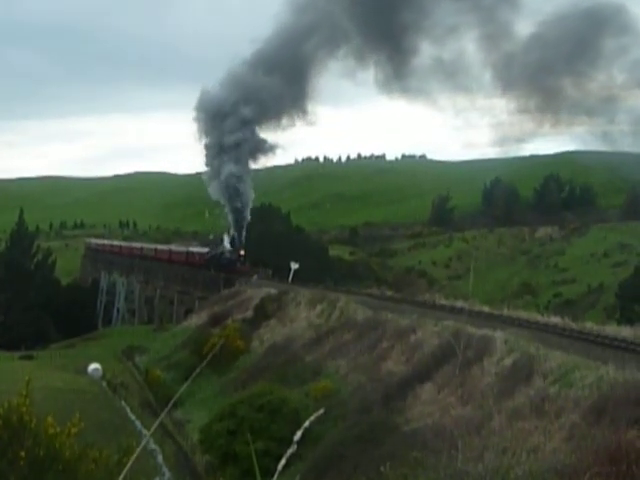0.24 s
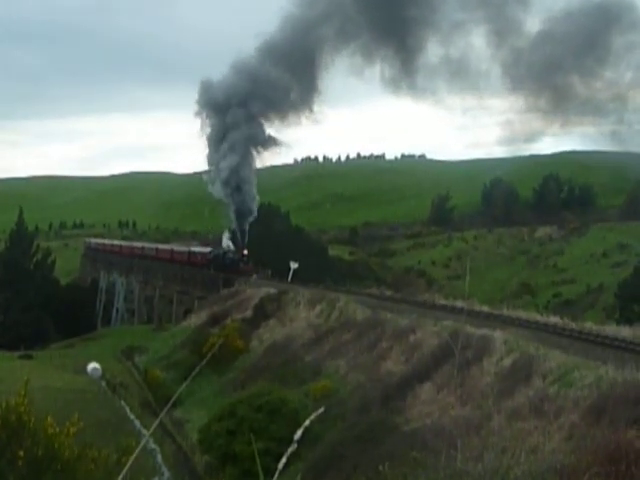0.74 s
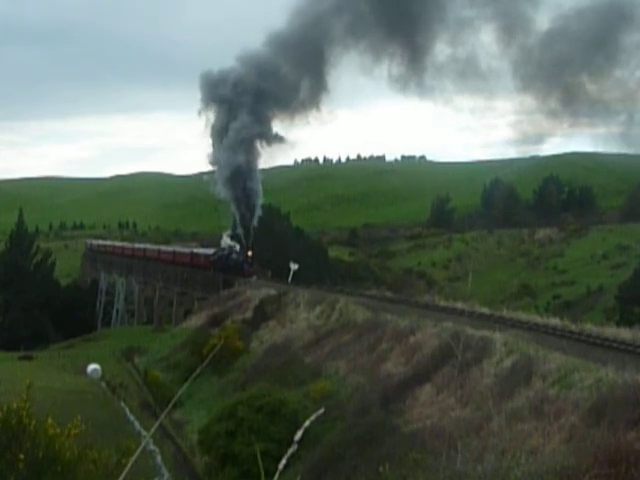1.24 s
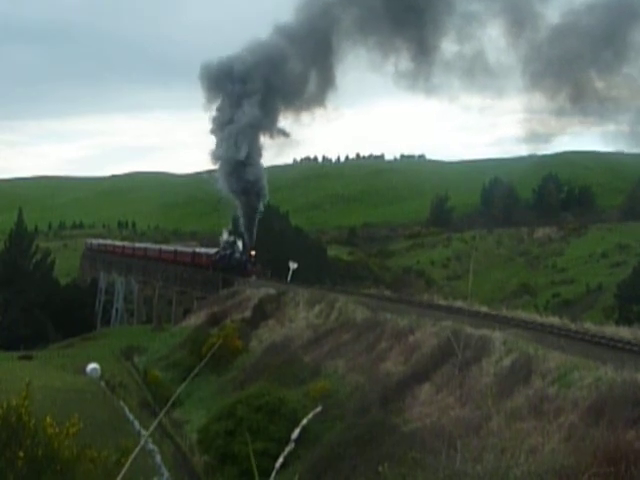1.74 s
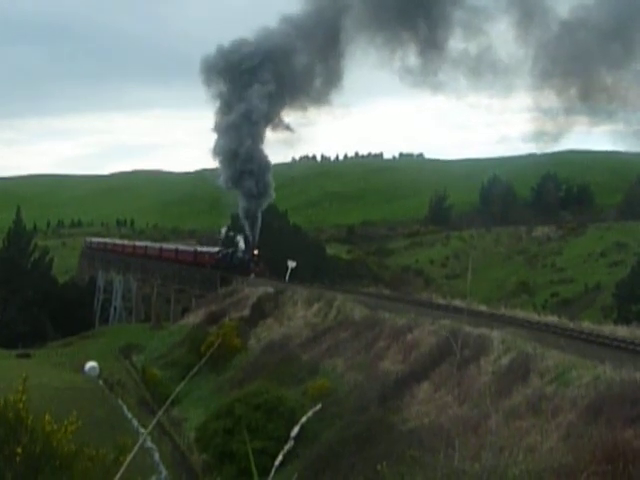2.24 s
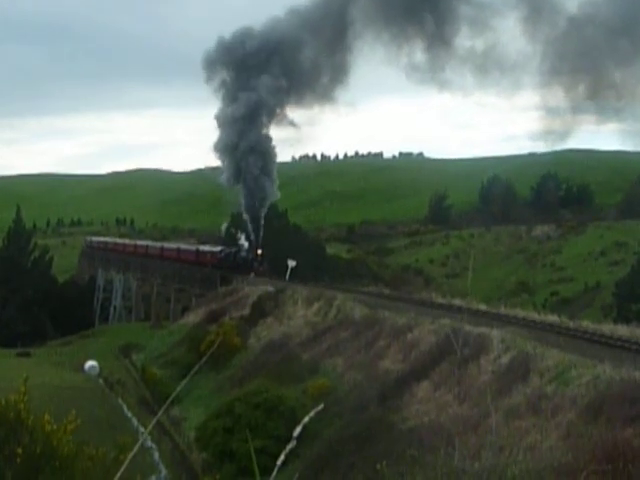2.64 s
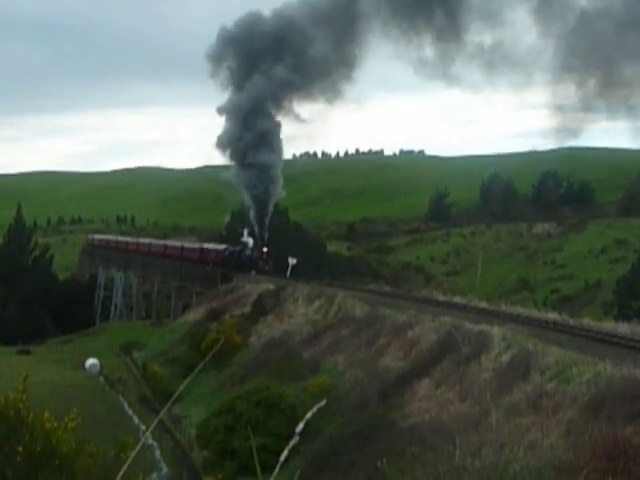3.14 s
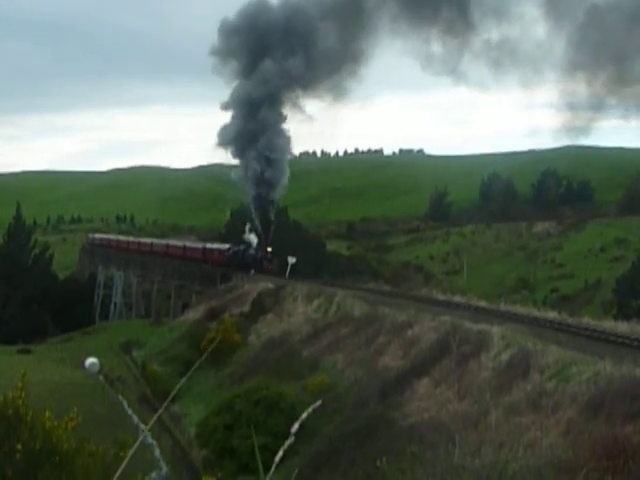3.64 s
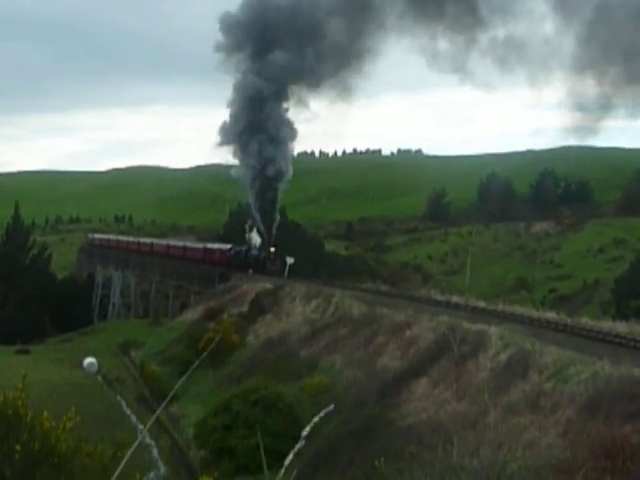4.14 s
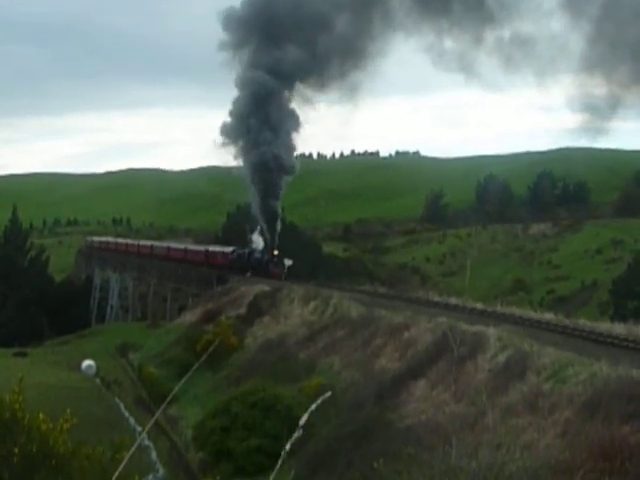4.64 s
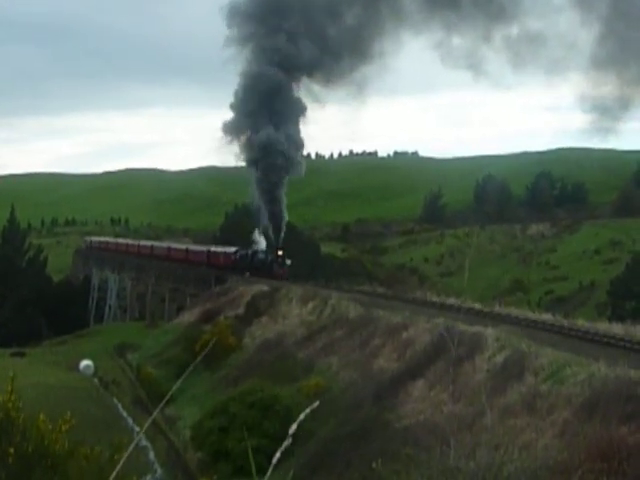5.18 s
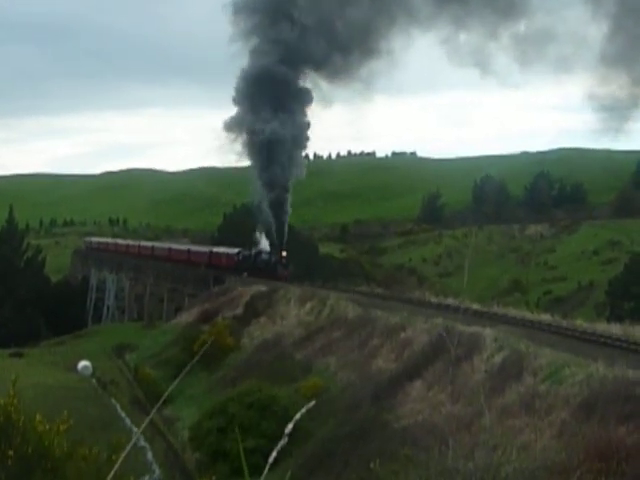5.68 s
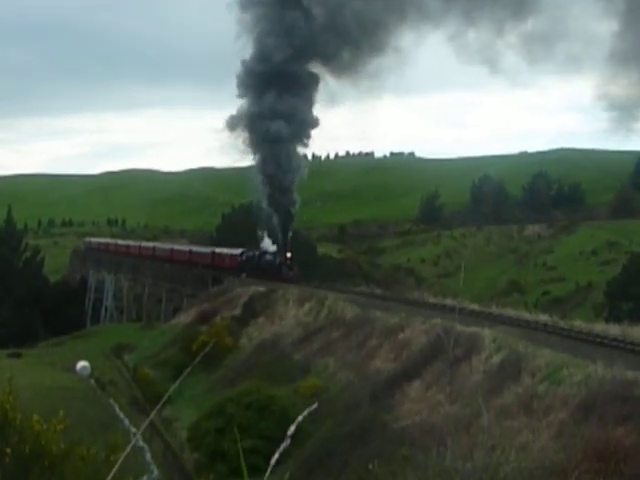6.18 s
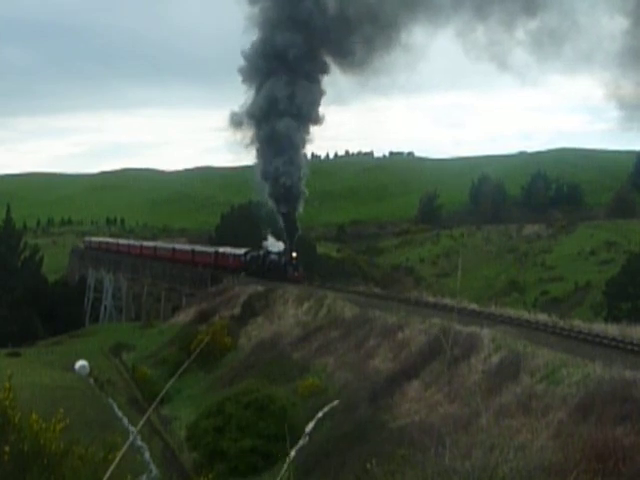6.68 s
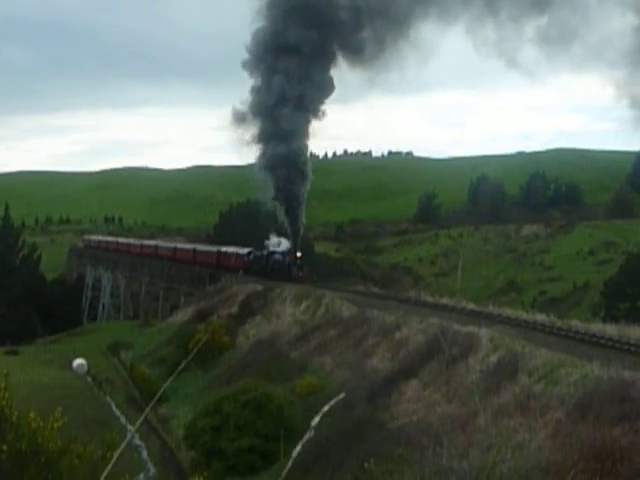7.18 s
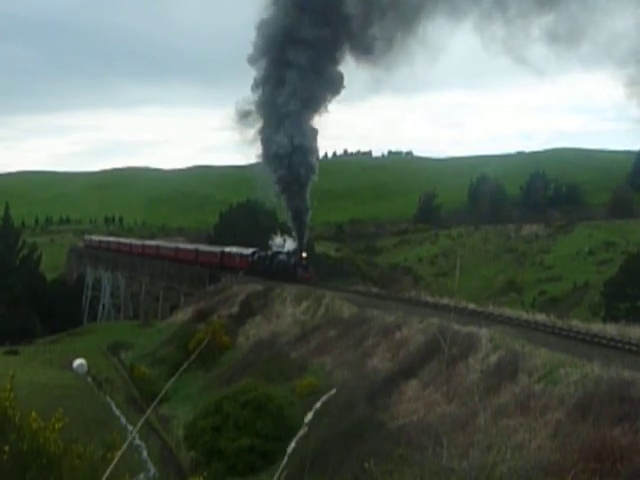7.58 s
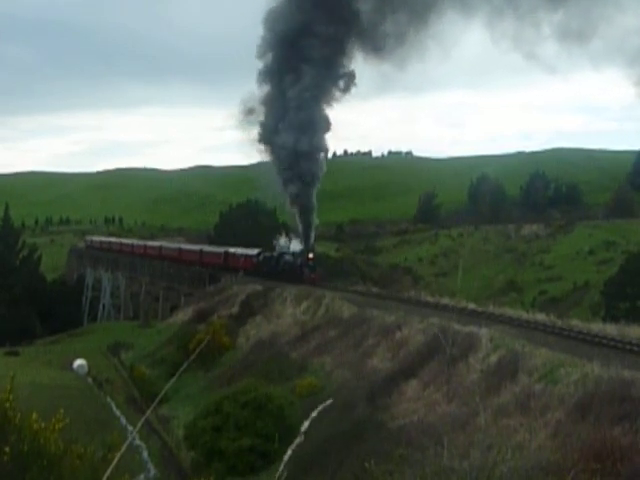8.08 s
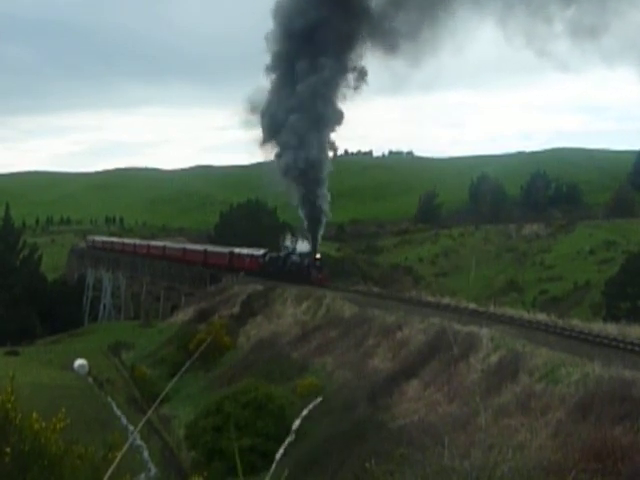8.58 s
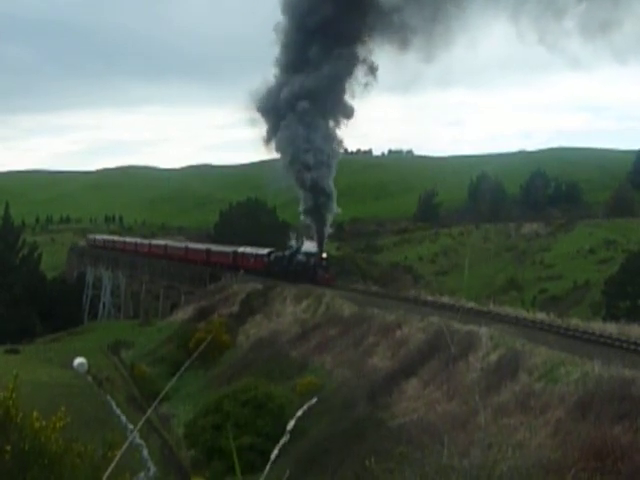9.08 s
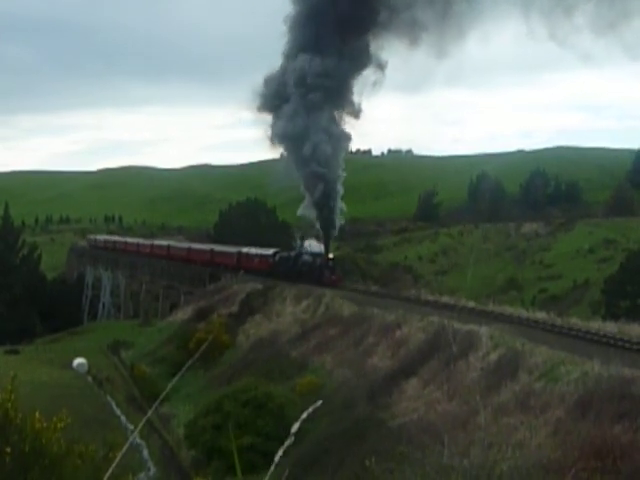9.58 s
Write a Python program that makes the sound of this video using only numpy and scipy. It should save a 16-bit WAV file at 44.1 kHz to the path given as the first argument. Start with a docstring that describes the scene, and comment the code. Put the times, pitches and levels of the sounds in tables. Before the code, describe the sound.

Fast, steady puffs of a distant steam train working along a hillside, with light hiss and a soft rolling rumble.

```python
"""On a hillside line some way off, a steam locomotive climbs at nearly five exhaust beats a second.
Each beat is a turbulent jet, coloured by the chimney and nearby reflections, hollowed by interference
with the wave off the ground and echoed by the hills. Beneath it the train rumbles and a viaduct drums;
steam leaks, small ticks sound, a wheel flange sings faintly and a thin whine persists.
A fast limiter flattens the loudest peaks."""
import sys
import numpy as np
from scipy import signal
from scipy.fft import rfft, irfft, next_fast_len
from scipy.io import wavfile
from scipy.ndimage import uniform_filter1d, minimum_filter1d

SR = 44100
rng = np.random.default_rng(int(sys.argv[2]) if len(sys.argv) > 2 else 0)


def unload_audio(sound):
    """Save the sound as a 16-bit wav file, at the path given as the first command line argument."""
    columns = np.transpose(np.atleast_2d(sound))
    # keep every value between -1 and 1, then stretch to whole-number steps
    steps = np.round(np.clip(columns, -1, 1) * 32767)
    wavfile.write(sys.argv[1], SR, steps.astype(np.int16))


N = 433062
TIME = np.arange(N) / SR

# The engine gathers speed, then eases: time_s, beat_rate_hz
BEAT_RATE = [(0, 4.693), (1.5, 4.559), (3, 4.668), (6.5, 5.201), (7.5, 5.092), (9.8, 4.707)]
# Four unevenly set valve events to a wheel turn: delay_s, bark_offset_db, hiss_offset_db
VALVES = [(.0026, -0.25, 0.15), (.0041, .5, 0.9), (-.0011, -0.5, -.6), (0, -0.4, -0.7)]
# Broad spectrum of the exhaust: frequency_hz, density_db
EXHAUST_SPECTRUM = [(25, -36.5), (50, -22.5), (150, -16), (235, -14.5), (300, -8), (420, -10), (560, -17.5),
                    (1000, -21), (1650, -26), (2100, -29), (4200, -38.5), (6000, -49), (7200, -58.5),
                    (8400, -76)]
# Peaks and one dip colouring it, from the chimney and nearby reflections: centre_hz, width_hz, gain_db
EXHAUST_COLOUR = [(48, 8.9, 3), (93, 5.4, 8.5), (141, 4.1, 3), (198, 26, 4.5), (270.9, 28.8, 9),
                  (308.7, 35, 10), (343.3, 35.5, 7.5), (381, 38, 2), (525, 19, 0), (609.5, 23, 5.5),
                  (686.6, 58, 8.5), (887, 81, 4), (979.4, 43, 7.5), (1107, 49, 4.5), (1261, 97, 6.5),
                  (1508, 56, 5), (1688, 38, 5), (2310, 83, 4), (2877, 260, 5.5), (3570, 15, 7),
                  (3840, 35, -5), (5880, 190, 5)]
# Interference of the direct and ground-reflected waves, mostly dips: centre_hz, width_hz, gain_db
GROUND_INTERFERENCE = [(68.5, 40, -4), (118.5, 16, -13), (217, 15, -6.5), (484.7, 26, -5.5),
                       (561, 30, -11.5), (756, 45, -7), (1178, 40, -4.5), (1420, 35, 2.5),
                       (2068, 320, -4.5), (2780, 20, -7.5), (3260, 390, -4)]
# The peaks and dips sink a little as the engine moves along: time_s, frequency_ratio
COLOUR_SHIFT = [(0, 1.082), (2.5, 1.0203), (5.5, 0.994), (9.8, 1.016)]
# Boom of the blasts, below 480 Hz: time_s, offset_db
BOOM_TREND = [(0, -2.3), (0.4, -1), (0.84, 0.3), (3.85, -0.7), (4.27, -1.5), (4.87, 1), (6.26, 0.1),
              (9.66, 0.1)]
# Their bark, up to about 2 kHz: time_s, offset_db
BARK_TREND = [(0, -1.3), (0.84, 2.5), (1.05, -1.0), (1.49, -0.3), (1.71, -2), (3.0, 4), (3.22, 0.1),
              (3.65, 3), (4.27, -0.9), (5.28, -1.2), (5.67, -4.5), (6.45, 0), (8.63, -1.3), (8.83, 3.1),
              (9.66, 0.5)]
# Their hiss, near 2.3 kHz: time_s, offset_db
HISS_TREND = [(0, 2.2), (0.84, 3.5), (1.05, 0), (1.49, 5), (1.93, -3), (2.8, 3.3), (3.22, -8), (3.65, -3.5),
              (3.85, -7.5), (4.47, -0.7), (4.87, -3), (5.28, 5), (5.47, -0.1), (8.63, 0.4), (9.02, -4.5),
              (9.66, 1)]
# The treble above it, fading in and out over the distance: time_s, offset_db
TREBLE_TREND = [(0, -2), (0.4, 1.5), (1.05, -8.5), (1.49, 2), (1.71, -4.5), (1.93, 2), (2.36, 5.5),
                (3.22, -1.5), (3.43, 1.2), (4.87, -1.3), (5.28, 3), (5.67, -3), (6.07, 1.5), (6.26, -0.1),
                (7.62, -0.5), (7.81, 4), (9.25, -6), (9.66, 5)]
# Spectrum of the rolling train: frequency_hz, density_db
ROLLING_SPECTRUM = [(20, -26), (45, -7.5), (90, -5), (200, -1), (320, 0.5), (560, -6.5), (1000, -10),
                    (1600, -18.5), (2200, -22), (2900, -24), (3500, -30.5), (7000, -37.5), (8400, -48)]
# Its loudness: time_s, level_db
ROLLING_LEVEL = [(0, -39), (3.5, -41), (5, -39.5), (6, -40), (8.8, -37.5), (9.8, -40)]
# Spectrum of the vibrating viaduct: frequency_hz, density_db
VIADUCT_SPECTRUM = [(25, -28.5), (50, -8.5), (90, -1), (125, -7), (160, -3.5), (220, -7), (330, -29.5),
                    (800, -70)]
# Its swells: time_s, level_db
VIADUCT_LEVEL = [(0, -54), (1.4, -51), (2.2, -43.5), (2.9, -53), (3.6, -42), (4.2, -45.5), (4.8, -38.5),
                 (5.8, -52.5), (6.8, -51.5), (7.5, -40), (8.8, -40), (9.3, -47), (9.8, -43)]
# Reverberation time among the hills: frequency_hz, t60_s
HILL_DECAY = [(80, 0.3), (300, 0.38), (1000, 0.34), (3000, 0.24), (7000, 0.25)]
# Wisps of leaking steam: peak_s, width_s, level_db
WISPS = [(.16, 0.02, -46), (8.78, 0.027, -50.5), (9.02, .03, -41.5)]
# Their spectrum: frequency_hz, density_db
WISP_SPECTRUM = [(500, -20), (1200, 2.5), (3000, -4), (4000, -16.5), (8000, -35)]
# Faint ticks and spits: start_s, level_db, decay_s
TICKS = [(.357, -47, .002), (.375, -49, .002), (1.645, -50, 0.006), (2.057, -38, .002), (2.114, -44, 0.01),
         (4.241, -50, 0.0052), (7.977, -47, 0.0036)]
# Their spectrum: frequency_hz, density_db
TICK_SPECTRUM = [(900, -27), (2000, 8), (5500, -3), (7200, -7), (8400, -36)]
# A wheel flange singing on the curve: time_s, level_db
FLANGE_LEVEL = [(0, -72), (.72, -76), (.9, -58), (1.1, -67), (2.09, -62), (2.3, -79), (2.96, -63.5),
                (3.38, -70), (4.43, -70), (4.63, -76), (7.97, -73), (9.18, -74), (9.61, -64)]


def amp(db):
    """Amplitude ratio of a level in decibels."""
    return 10 ** (np.asarray(db) / 20)


def unit_rms(x):
    """Normalisation to unit mean power."""
    return x / np.sqrt(np.mean(x ** 2) + 1e-20)


def at_hz(points, hz):
    """Interpolation on a logarithmic frequency axis."""
    table_hz, values = np.transpose(points)
    return np.interp(np.log(hz + 1), np.log(table_hz + 1), values)


def at_time(points, t):
    """Linear interpolation in time."""
    return np.interp(t, *np.transpose(points))


def bells_db(rows, hz):
    """Gaussian peaks and dips in cascade: their decibels add."""
    return sum(db * 2 ** -((2 * (hz - centre) / width) ** 2) for centre, width, db in rows)


def add(mix, start_s, sound):
    """Superposition of a sound on the mix."""
    at = round(start_s * SR)
    sound = sound[max(-at, 0):]
    part = mix[max(at, 0):][:len(sound)]
    part += sound[:len(part)]


def wander(n, rate_hz):
    """Low-pass Gaussian fluctuation of zero mean and unit rms."""
    hz = np.fft.rfftfreq(n, 1 / SR)
    lowpass = np.exp(-(hz / rate_hz) ** 2) * (hz > 0)
    return unit_rms(irfft(rfft(rng.standard_normal(n)) * lowpass, n))


def coloured_noise(spectrum, n):
    """Spectral shaping of white noise, at unit rms."""
    size = next_fast_len(n)
    gain = amp(at_hz(spectrum, np.fft.rfftfreq(size, 1 / SR)))
    return unit_rms(irfft(rfft(rng.standard_normal(size)) * gain, size)[:n])


def minimum_phase(gain_db):
    """Causality: a response with this gain that rings only after it is excited."""
    log_gain = np.log(amp(np.r_[gain_db, gain_db[-2:0:-1]]))
    return np.exp(np.conj(signal.hilbert(log_gain)))[:len(gain_db)]


def steam_jet(t, response, lead, rise, hold, fall, gust_db):
    """Turbulent noise grows as a valve opens and dies as the cylinder empties; filtered, unit rms."""
    opening = np.sin(np.pi / 2 * np.clip((t + lead) / rise, 0, 1)) ** 2
    pressure = 1 / np.sqrt(1 + np.exp(np.minimum(2 * (t - hold) / fall, 100)))
    flow = rng.standard_normal(len(t)) * opening * pressure
    gusts = amp(gust_db * wander(len(t), 130))
    return unit_rms(irfft(rfft(flow * gusts) * response))


def blast(t, beat_s, bark_offset_db, hiss_offset_db):
    """Source and filter: a jet in three bands, coloured by chimney, nearby reflections and ground."""
    hz = np.fft.rfftfreq(len(t), 1 / SR)
    # A shorter blast spends the same energy sooner and so cracks harder.
    stroke = t / np.exp(0.059 * rng.standard_normal())
    # Moving air ripples the treble differently for every beat.
    ripple_db = 2.5 * wander(len(t), 600)[:len(hz)] * hz / (hz + 400)
    peaks_db = bells_db(EXHAUST_COLOUR + GROUND_INTERFERENCE, hz / at_time(COLOUR_SHIFT, beat_s))
    colour = minimum_phase(at_hz(EXHAUST_SPECTRUM, hz) + peaks_db + ripple_db)
    low = 1 / (1 + (hz / 480) ** 8)  # each band's share of the power
    high = 1 / (1 + (1950 / (hz + 1)) ** 8)
    mid = (1 - low) * (1 - high)
    boom = steam_jet(stroke, colour * low ** .5, lead=.025, rise=.055, hold=.059, fall=.036, gust_db=-.5)
    bark = steam_jet(stroke, colour * mid ** .5, lead=.018, rise=.045, hold=.053, fall=.031, gust_db=1)
    hiss = steam_jet(stroke, colour * high ** .5, lead=.015, rise=.047, hold=.049, fall=.025, gust_db=1)
    boom *= amp(at_time(BOOM_TREND, beat_s) - 26)
    bark *= amp(at_time(BARK_TREND, beat_s) + bark_offset_db - 34.5)
    shelf = [(2330, at_time(HISS_TREND, beat_s) - 45.5), (4670, at_time(TREBLE_TREND, beat_s) - 46.5)]
    hiss = irfft(rfft(hiss) * amp(at_hz(shelf, hz) + hiss_offset_db))
    # The first slug of steam leaves the chimney as one soft thud.
    pulse_time = (t - .009) / .0033
    thud = amp(-33) * pulse_time * np.exp(-pulse_time ** 2 / 2)
    return boom + bark + hiss + thud


def engine(lead_in_s=.03):
    """Rotation sets the pulse rate: each quarter turn of the driving wheels releases one blast."""
    out = np.zeros(N)
    t = TIME - .0247  # the first beat is already under way
    blast_time = np.arange(16384) / SR - lead_in_s
    quarter_turns = np.cumsum(at_time(BEAT_RATE, t)) / SR
    due_times = np.interp(np.arange(quarter_turns[-1]), quarter_turns, t)
    for k, due_s in enumerate(due_times):
        delay_s, bark_offset_db, hiss_offset_db = VALVES[k % len(VALVES)]
        beat_s = due_s + delay_s
        add(out, beat_s - lead_in_s, blast(blast_time, beat_s, bark_offset_db, hiss_offset_db))
    return out


def rolling_train():
    """Wheels, rods and leaks sum incoherently to a drifting rumble, hollowed by ground interference."""
    frames, hz = N // 512 + 5, np.fft.rfftfreq(2048, 1 / SR)
    real, imag, patches = rng.standard_normal((3, frames, len(hz)))
    patches = uniform_filter1d(patches, size=6, axis=0)  # smooth in time, then in frequency
    patches = unit_rms(uniform_filter1d(patches, size=10, axis=1))
    steady_db = at_hz(ROLLING_SPECTRUM, hz) + .29 * bells_db(GROUND_INTERFERENCE, hz)
    drift_db = 2.6 * patches / (1 + hz / 4000)
    spectra = (real + 1j * imag) * amp(steady_db + drift_db)
    rumble = signal.istft(spectra.T, nperseg=2048, noverlap=1536)[1][:N]
    return amp(at_time(ROLLING_LEVEL, TIME)) * unit_rms(rumble)


def viaduct():
    """Forced vibration: the structure drums in slow swells as the wheels cross its spans."""
    return amp(at_time(VIADUCT_LEVEL, TIME)) * coloured_noise(VIADUCT_SPECTRUM, N)


def whine(pitch_hz, waver_hz, flutter_db=2):
    """Random frequency and amplitude modulation make a thin sine tone waver."""
    size = next_fast_len(N)
    cycles = np.cumsum(pitch_hz + waver_hz * wander(size, 60)) / SR
    flutter = amp(flutter_db * wander(size, 7.6))
    return unit_rms(np.sin(2 * np.pi * cycles) * flutter)[:N]


def hill_echo(sound, reflections_per_s=2000):
    """Scattering from the hills returns many late reflections, the treble decaying first."""
    reflections = rng.choice([-1., 1.], SR) * (rng.random(SR) < reflections_per_s / SR)
    hz, t, spectra = signal.stft(reflections, SR, nperseg=256)
    onset = np.clip((t - .025) / .039, 0, 1)
    decay = amp(-60 * t / at_hz(HILL_DECAY, hz)[:, None])
    tail = signal.istft(spectra * onset * decay, SR, nperseg=256)[1]
    tail = signal.lfilter(*signal.butter(1, 1800, fs=SR), tail / np.linalg.norm(tail))
    return signal.fftconvolve(sound, tail)[:N]


def steam_wisps():
    """Turbulence of leaking steam swells and fades under Gaussian envelopes."""
    envelope = sum(amp(db) * np.exp(-((TIME - peak_s) / width_s) ** 2) for peak_s, width_s, db in WISPS)
    return envelope * coloured_noise(WISP_SPECTRUM, N)


def ticks():
    """Noise transients with rapid exponential decay are heard as dry clicks and spits."""
    out, t = np.zeros(N), np.arange(2048) / SR
    for start_s, level_db, decay_s in TICKS:
        click = coloured_noise(TICK_SPECTRUM, len(t)) * np.exp(-t / decay_s)
        add(out, start_s - .001, amp(level_db) * click)
    return out


def wheel_flange():
    """Friction on the curve makes a wheel sing at one wavering pitch."""
    return amp(at_time(FLANGE_LEVEL, TIME)) * whine(pitch_hz=4247, waver_hz=24)


def scene():
    """Superposition of the exhaust, its echo and the train's quieter sounds in one channel."""
    exhaust = engine()
    rumble = rolling_train() + viaduct()
    faint_whine = amp(-80) * whine(pitch_hz=6667, waver_hz=3)
    echo = amp(-20) * hill_echo(exhaust)
    return (exhaust + rumble + faint_whine + echo + steam_wisps() + ticks() + wheel_flange())[None]


def record(dry, ceiling_db=-10, recovery_db_per_s=350, cutoff_hz=8500):
    """Peak limiting lowers the gain at the loudest moments; a low-pass filter then bounds the band."""
    excess_db = np.maximum(20 * np.log10(abs(dry[0]) + 1e-9) - ceiling_db, 0)
    recovery_db = TIME * recovery_db_per_s
    reduction_db = np.maximum.accumulate(excess_db + recovery_db) - recovery_db
    held_db = -minimum_filter1d(-reduction_db, size=45)  # running maximum over 1 ms
    gain = amp(-uniform_filter1d(held_db, size=45))
    lowpass = signal.firwin(255, cutoff_hz, window=("kaiser", 9), fs=SR)
    return signal.oaconvolve(dry * gain, lowpass[None], "same")


dry = scene()
out = record(dry)
unload_audio(out)
```